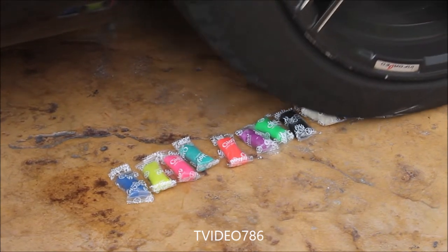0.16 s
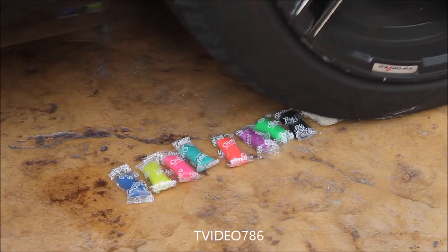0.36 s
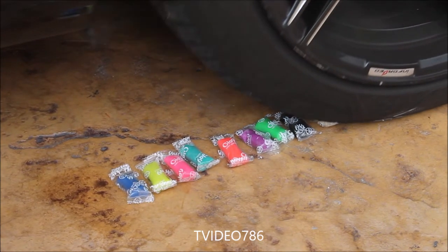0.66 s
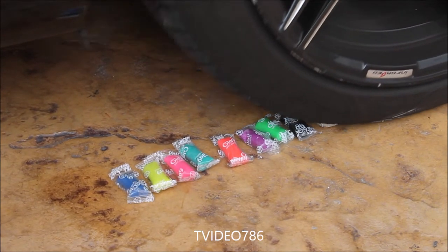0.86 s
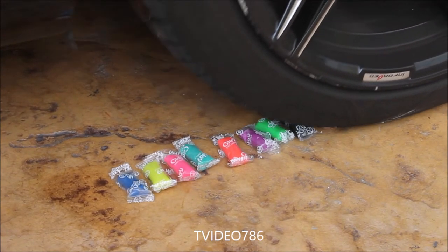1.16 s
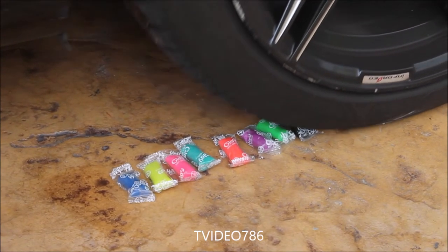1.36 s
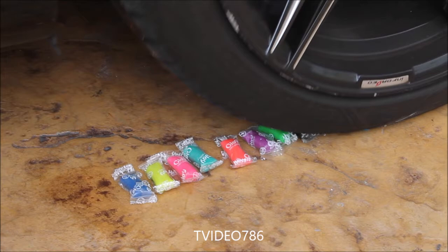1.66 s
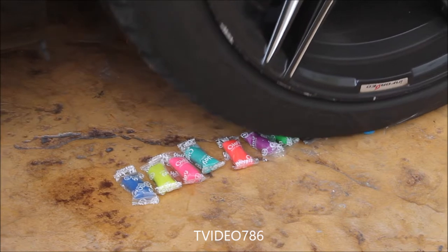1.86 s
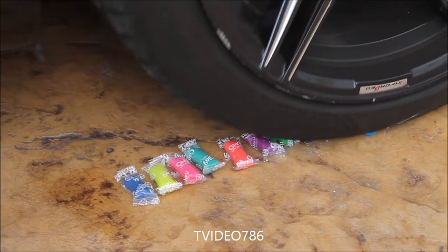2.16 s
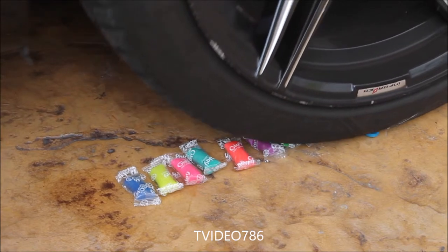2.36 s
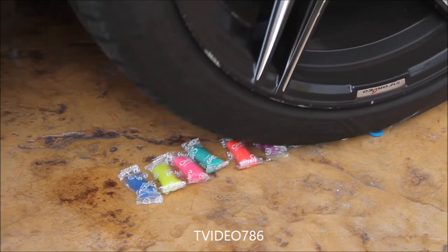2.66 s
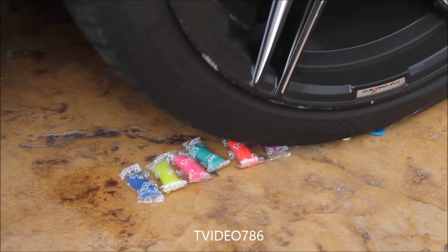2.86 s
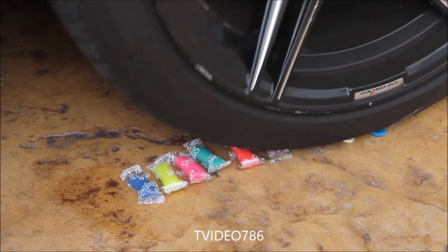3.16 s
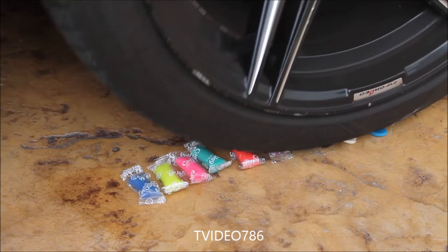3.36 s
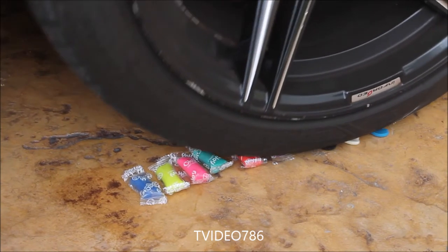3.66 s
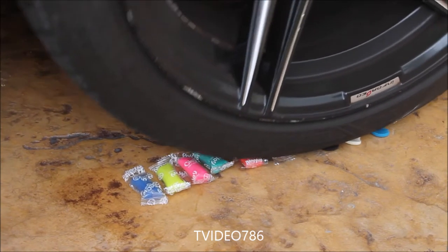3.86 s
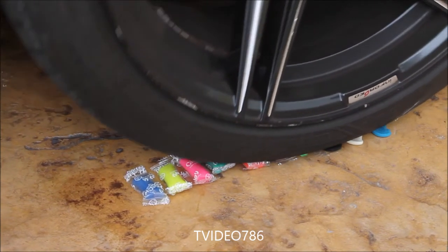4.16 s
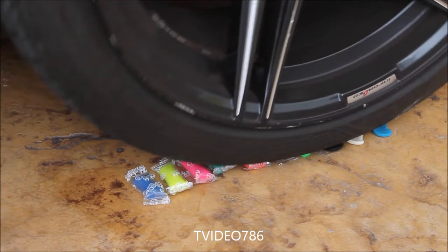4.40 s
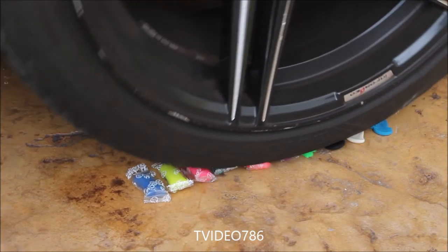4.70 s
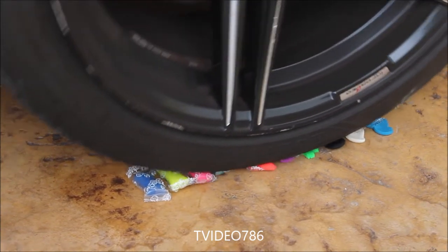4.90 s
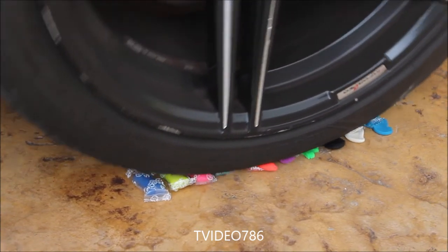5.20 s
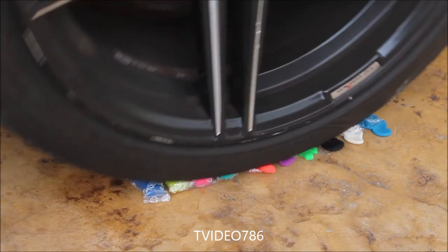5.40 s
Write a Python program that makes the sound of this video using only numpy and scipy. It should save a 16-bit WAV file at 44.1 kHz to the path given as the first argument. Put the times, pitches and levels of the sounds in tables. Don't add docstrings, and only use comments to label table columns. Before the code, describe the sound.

Sealed plastic air packets burst one after another under a slowly creeping car tyre, each loud pop clipping and echoing through a large hard hall.

```python
import sys
import numpy as np
from scipy import signal
from scipy.fft import rfft, irfft, next_fast_len
from scipy.io import wavfile
from scipy.ndimage import map_coordinates

SR = 44100
rng = np.random.default_rng(int(sys.argv[2]) if len(sys.argv) > 2 else 0)


def level_to_linear(level):
    exponent = np.asarray(level, float) / 20
    return 10 ** exponent


def generate_wav(signal):
    frames = np.transpose(np.atleast_2d(signal))
    scaled = np.clip(frames, -1, 1) * 32767
    pcm = np.round(scaled).astype(np.int16)
    wavfile.write(sys.argv[1], SR, pcm)


N = 244314

# [t/s, hall level/dB, wall slap level/dB, air pocket f/Hz, pocket sharpness Q/1]
PACKETS = [(0.4756, -19.5, -17, 1240, 1.2), (0.5535, -21.5, -6.5, 1455, 0.65),
           (0.7213, 0.5, 2.5, 828, 0.76), (1.0433, -0.5, -8, 1280, 0.94), (1.6781, 7.5, -3, 823, 0.76),
           (2.6223, -11, -33, 1296, 0.77), (2.663, 8, 0, 489, 1.15), (3.0375, -15.5, 0.5, 1032, 0.78),
           (3.2064, -27, -21, 1416, 0.64), (3.6376, 9, -0.5, 890, 0.61), (4.1808, 11.5, -7.5, 856, 1),
           (4.657, 12, -3, 1031, 1.26), (5.1955, -11, -9, 1360, 0.9), (5.3439, -15.5, -12, 1005, 0.81)]
# [delay t/s, level over the hall/dB, drift of level as the tyre moves/(dB/s)]
WALL_SLAPS = [
    (0.041, -2, -1),
    (.085, 1.5, 1.5),
    (0.1019, 8, 2.6),
    (.349, 4, 9.5),
]
# [f/Hz, decay by 60 dB t/s]
HALL_DECAY = [(100, 2.18), (400, 2.32), (1000, 2.12), (2500, 1.47), (5500, 0.81)]
# [t/s, level/dB]
HALL_SWELL = [(.5, 0.5), (0.798, -1.5), (1.101, 1.5), (1.401, 2.5), (1.748, 0.5), (1.998, -3.5),
              (2.299, 2.5), (2.6, -2), (2.751, 5.5), (3, 1), (3.398, 1.5), (3.751, -1), (4, -1.5),
              (4.4, -0.5), (4.748, 1), (5.099, -2), (5.299, 2), (5.54, 4)]
# [t/s, tick level/dB, knock level/dB,
# knock f/Hz]
SNAPS_AND_SLAPS = [(0.3401, -22.5, -16.5, 1030), (0.375, -23, -24.5, 953), (0.4948, -17, -9.5, 1230),
                   (0.5113, -11, -11, 923), (0.7502, -15.5, -1.5, 865), (1.1438, -39.5, -8.5, 772),
                   (1.1949, -48, -5, 675), (1.849, -29, -6, 957), (2.5096, -28.5, -12, 1150),
                   (2.654, -7, -17, 1330), (2.6942, -12, 1.5, 490), (2.819, -21, -7.5, 592), (2.9514, -28, -6, 623),
                   (3.7236, -18, -3, 1460), (3.7607, -26, -6.5, 904), (3.7749, -22.5, -5.5, 602),
                   (3.899, -26, -11.5, 1455), (3.9459, -23, -2, 907), (4.058, -19, -3.5, 944),
                   (4.3358, -43, -3.5, 937), (4.57, -14.5, -9.5, 614), (4.7414, -9, -1, 1353),
                   (4.9641, -18, -3.5, 929), (5.0052, -15.5, -1, 893), (5.0615, -30.5, -11, 931),
                   (5.0762, -25.5, -3, 1029), (5.2464, -11, -23.5, 1050), (5.2874, -7.5, -14, 750),
                   (5.434, -15.5, -12.5, 816), (5.47, -12.5, -9, 1010)]
# [t/s, peak level/dB, f/Hz]
FILM_CRACKLES = [(0.6564, -22.5, 2460), (0.6726, -11.5, 2255), (1.4179, -21, 2240), (2.0585, -26, 2200),
                 (2.066, -24, 2350), (2.174, -19.5, 2690), (2.2708, -14, 2550), (2.3201, -23.5, 2440),
                 (2.4446, -19.5, 2150), (2.5456, -35, 3500), (2.5594, -14.5, 2380), (2.6174, -5, 2324),
                 (3.274, -29, 2540), (3.2928, -22, 2570), (3.3197, -28, 2490), (3.4865, -21, 2310),
                 (3.501, -33, 2970), (3.5538, -19, 2190), (3.5634, -11.5, 3000), (4.147, -18.5, 2410),
                 (4.6139, -30.5, 2210), (5.1633, -19.5, 2280)]
# [f/Hz, level/(dB per Hz)]
RUMBLE_SPECTRUM = [(15, -22.5), (25, 2.5), (146, -6.5), (183, -10), (302, -10), (362, -18.5), (414, -10),
                   (497, -12), (4780, -44.5), (5600, -56.5), (7280, -103), (12300, -120)]
# [f/Hz, sharpness Q/1, level/dB]
FIRING_HUM = [
    (82.4, 15, -16.5),
    (177.8, 13, -12),
]
# [f/Hz, level/(dB per Hz)]
HISS_SPECTRUM = [(1500, -36.5), (3000, 9), (5800, 11)]
# [f/Hz, level/dB]
MICROPHONE_RESPONSE = [(20, -19.5), (45, -6), (70, 1), (5000, -4), (6200, -9)]
# [t/s, length t/s, lower edge f/Hz]
TREBLE_GAPS = [(.13, .012, 3000), (.795, .008, 3300), (1.882, .01, 3000), (1.947, .008, 3000),
               (2.03, .045, 2800), (2.396, .008, 2900), (2.54, .008, 3600), (3.833, .028, 3000),
               (3.908, .008, 3100), (4.228, .006, 3500), (4.313, .006, 3000), (5.145, .008, 2600)]
# [t/s, length t/s, f/Hz, level/dB]
GAP_TONES = [(3.835, .06, 4180, -37), (3.82, .045, 3750, -36), (3.912, .025, 2550, -33),
             (2.03, .05, 2600, -39), (2.02, .05, 2200, -36), (1.945, .04, 2700, -36),
             (2.55, .03, 3200, -34), (2.395, .03, 2500, -39)]

BLAST_DB, BLAST_PER_DB = 20.5, 1.02
FAINTEST_BLAST_DB = -2.5
THUMP_DB, THUMP_PER_Q_DB = 7.5, -16.5
NEAR_THUMP_DB = 2.5
FILM_DB, FILM_PER_DB, FILM_HZ = -34, -0.562, 2640
FILM_PER_OCTAVE_DB = -20
RATTLE_S, RATTLE_S_PER_DB = 0.03, 0.0032
SHADE_DB_PER_S = 3.5
SLAP_FRONT_DB = 7.5
BUNCH_DB, BUNCHES_PER_S = 1.2, 30
DUCK_DB, DUCK_PER_DB = 15.5, 0.75
RECOVER_S, RECOVER_S_PER_S = 0.18, 0.054
STACKING = 1.64
TICK_HZ, TICK_SPREAD = 2800, 0.098
TOP_HZ = 5780


def bursts():
    out = np.zeros(N)
    t = np.arange(round(1.4 * SR)) / SR
    for s, hall_db, slap_db, hz, q in PACKETS:
        blast_db = max(BLAST_DB + BLAST_PER_DB * hall_db, FAINTEST_BLAST_DB)
        rattle_s = max(RATTLE_S + RATTLE_S_PER_DB * blast_db, 0.01)
        thump = level_to_linear(THUMP_DB + THUMP_PER_Q_DB * q)
        film = level_to_linear(FILM_DB + FILM_PER_DB * blast_db + FILM_PER_OCTAVE_DB * np.log2(hz / 1000))

        def colour(f):
            body = pocket(f, hz, q) ** 2 - thump * pocket(f, 382, 0.52) ** 2
            return body + film * pocket(f, FILM_HZ, 0.94) ** 2

        def near_thump(f):
            return pocket(f, 0.81 * hz, 3.4 * q) ** 2

        white = np.sqrt(SR * q / hz)
        envelope = level_to_linear(-60 * t / 0.017) + level_to_linear(-11.5 - 60 * t / rattle_s)
        under_car = rng.standard_normal(len(t)) * envelope
        under_car[0] = -4.5
        reply = hall_answer(count=len(t), s=s, slap_db=slap_db, grain_db=3.0, build_s=0.0046)
        direct = level_to_linear(blast_db - 2.5) * under_car
        reverberant = level_to_linear(hall_db - 3.0 - SHADE_DB_PER_S * t) * reply
        add(out, s, white * filtered(direct + reverberant, colour))
        add(out, s, -white * level_to_linear(blast_db + NEAR_THUMP_DB - 14) * filtered(under_car, near_thump))
    return out


def hall_answer(count, s, slap_db, grain_db, build_s):
    t = np.arange(count) / SR
    grain = np.minimum(rng.exponential(size=count), 5.5)
    scatter = unit(rng.standard_normal(count) * level_to_linear(grain_db * grain))
    scatter *= 1 - np.exp(-t / build_s)
    early = t[:300]
    for delay, db, drift_db in WALL_SLAPS:
        level_db = db + drift_db * (s - 5.5) + slap_db + 13.0
        rough = np.cos(2.8 * rng.standard_normal(300))
        front = level_to_linear(SLAP_FRONT_DB - early * 118500.0)
        add(scatter, delay, -level_to_linear(level_db - 60 * early / 0.0032) * (rough + front))
    hz, frames, z = signal.stft(scatter, SR, nperseg=256)
    decay = level_to_linear(-60 * frames / along(HALL_DECAY, hz)[:, None])
    return signal.istft(z * decay, SR, nperseg=256)[1][:count]


def gain_db(attack_s):
    s, hall_db = np.array(PACKETS).T[:2, :, None]
    duck_db = np.maximum(DUCK_DB + DUCK_PER_DB * hall_db, 0)
    recover_s = RECOVER_S + RECOVER_S_PER_S * s
    clock = np.arange(0, N, 32) / SR
    since = np.maximum(clock - s, 0)
    each = duck_db * (1 - np.exp(-since / attack_s)) * np.exp(-since / recover_s)
    duck = np.sum(each ** STACKING, axis=0) ** (1 / STACKING)
    return -np.interp(np.arange(N) / SR, clock, duck)


def snaps():
    out = np.zeros(N)
    t = np.arange(SR // 10) / SR
    ticks = [(s, db, TICK_HZ * np.exp(TICK_SPREAD * rng.standard_normal())) for s, db, *_ in SNAPS_AND_SLAPS]
    for s, tick_db, tick_hz in ticks + list(FILM_CRACKLES):
        rattle = rng.standard_normal(len(t)) * (level_to_linear(-60 * t / 0.0043) + level_to_linear(2.5 - 60 * t / 0.017))
        add(out, s, level_to_linear(tick_db + 8.5) * filtered(rattle, lambda f: pocket(f, tick_hz, 5.3)))
    for s, _, knock_db, knock_hz in SNAPS_AND_SLAPS:
        onset = 1 - np.exp(-t / 0.00013)
        decay = level_to_linear(knock_db + 5 - 60 * t / 0.023)
        add(out, s, -decay * np.sin(2 * np.pi * knock_hz * t) * onset)
    return out


def idle():
    swell = wobble(9)
    rumble = unit(filtered(rng.standard_normal(N), lambda f: level_to_linear(along(RUMBLE_SPECTRUM, f))))
    for hz, q, db in FIRING_HUM:
        rumble += level_to_linear(db) * unit(filtered(rng.standard_normal(N), lambda f: pocket(f, hz, q) ** 2))
    return level_to_linear(-19.5 + 1.1 * swell) * rumble


def input_hiss():
    return level_to_linear(-46.5) * unit(filtered(rng.standard_normal(N), lambda f: level_to_linear(along(HISS_SPECTRUM, f))))


def pocket(f, hz, q):
    return 1j * f * hz / q / (hz * hz - f * f + 1j * f * hz / q)


def filtered(x, response):
    m = next_fast_len(len(x) + SR // 4)
    return irfft(rfft(x, m) * response(np.fft.rfftfreq(m, 1 / SR)), m)[:len(x)]


def along(points, hz):
    f, v = np.transpose(points)
    return np.interp(np.log(hz + 1), np.log(f + 1), v)


def unit(x):
    return x / np.sqrt(np.mean(x ** 2) + 1e-20)


def wobble(rate):
    knots = rng.standard_normal(int(N * rate / SR) + 4)
    return map_coordinates(knots, [np.arange(N) * rate / SR])


def add(track, s, sound):
    room_left = track[round(s * SR):][:len(sound)]
    room_left += sound[:len(room_left)]


def scene():
    reach_db = np.interp(np.arange(N) / SR, *np.transpose(HALL_SWELL))
    reach_db = reach_db + BUNCH_DB * wobble(BUNCHES_PER_S)
    ridden = level_to_linear(gain_db(attack_s=0.012)) * (bursts() * level_to_linear(reach_db) + idle())
    return (ridden + snaps() + input_hiss())[None]


def top_cut(x):
    return signal.sosfilt(signal.butter(12, 16000, fs=SR, output="sos"), x)


def record(dry):
    heard = filtered(dry[0], lambda f: level_to_linear(along(MICROPHONE_RESPONSE, f)))
    hz, t, z = signal.stft(np.clip(heard, -1.7, 1.7), SR, nperseg=256)
    for s, length, edge_hz in TREBLE_GAPS:
        gap = np.clip((length / 2 - abs(t - s)) * 300 + 1, 0, 1)
        z = z * (1 - (hz[:, None] > edge_hz) * gap)
    gapped = signal.istft(z, SR, nperseg=256)[1][:N]
    for s, length, tone_hz, db in GAP_TONES:
        u = np.arange(round(length * SR))
        tone = np.hanning(len(u)) * np.sin(2 * np.pi * tone_hz * u / SR)
        add(gapped, s - length / 2, level_to_linear(db) * tone)
    steep = signal.ellip(8, 2, 65, TOP_HZ, fs=SR, output="sos")
    limited = np.clip(signal.sosfilt(steep, gapped), -0.98, 0.98)
    return top_cut(limited[None])


dry = scene()
out = record(dry)
generate_wav(out)
```